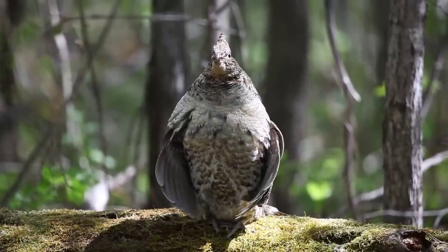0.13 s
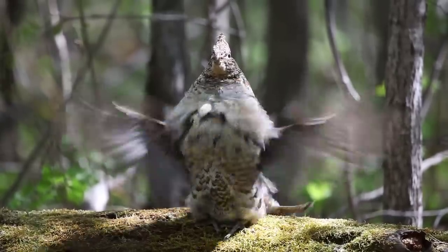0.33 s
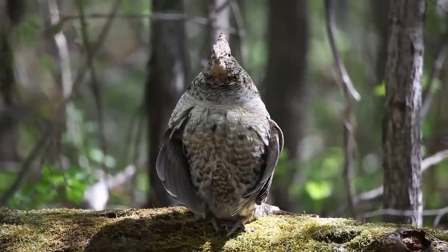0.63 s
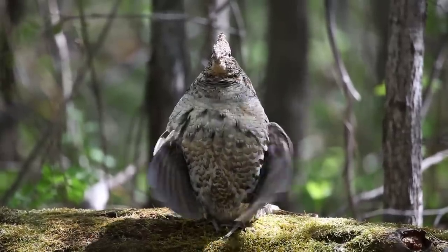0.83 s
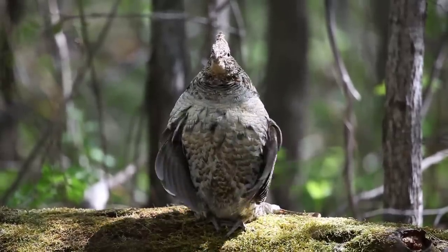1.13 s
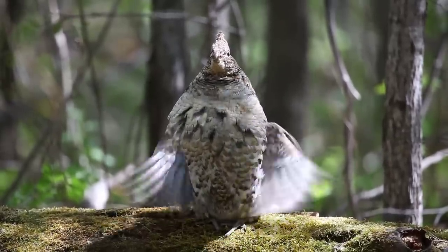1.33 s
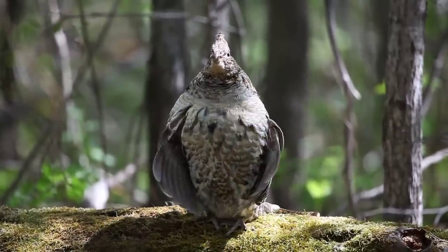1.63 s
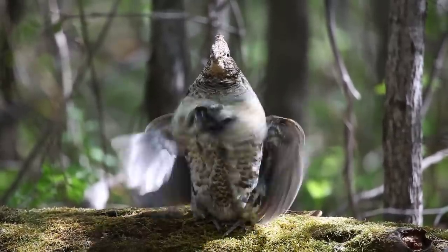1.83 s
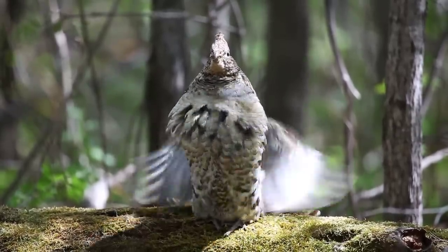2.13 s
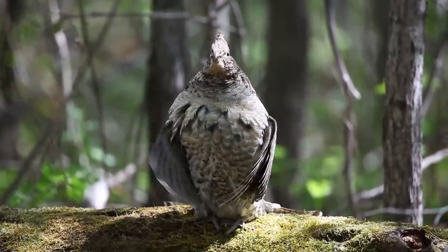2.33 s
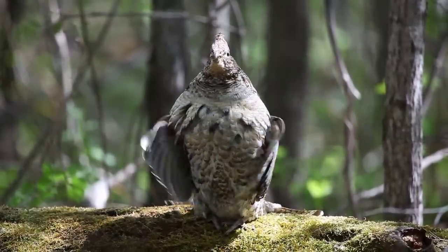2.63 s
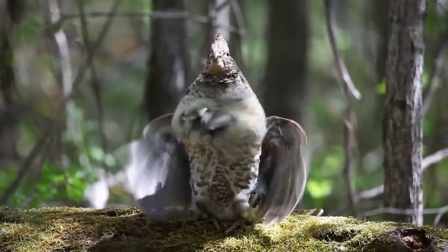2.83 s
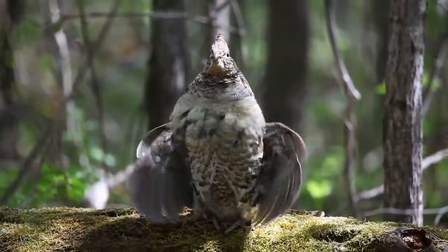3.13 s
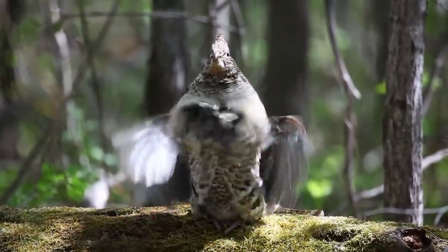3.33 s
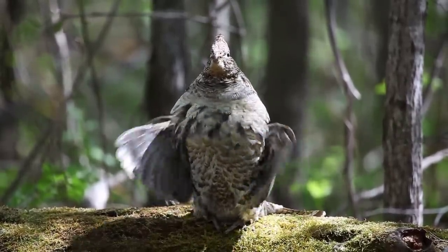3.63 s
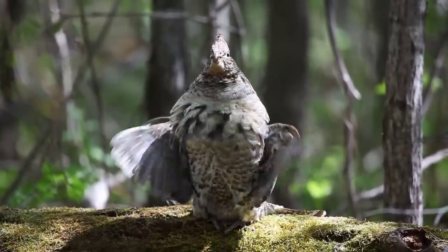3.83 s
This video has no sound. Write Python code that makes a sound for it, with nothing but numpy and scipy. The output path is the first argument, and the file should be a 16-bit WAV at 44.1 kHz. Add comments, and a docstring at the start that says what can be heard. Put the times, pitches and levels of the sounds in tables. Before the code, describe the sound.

Twelve accelerating low wing thumps, close and clear to the microphone, each with a brief feather swish and short bass echo; quiet outdoor woodland air, a faint insect buzz midway, and high bird chirps at the end.

```python
"""Grouse drumming on a log

A grouse drums with its wings, ever faster: each beat is a low, sagging pressure pulse with a puff and
a swish of feather noise. A resonant noise tail is the forest's soft answer in the bass.
Behind it: a far rush and leaf hiss of filtered noise, an insect's buzz of filtered clicks, faint dry
ticks of pulses into resonances, a bright twig snap, and a small bird's gliding sine whistles.
"""
import sys
import numpy as np
from scipy import signal
from scipy.fft import rfft, irfft, next_fast_len
from scipy.io import wavfile
from scipy.ndimage import uniform_filter1d, map_coordinates

SR = 44100
rng = np.random.default_rng(int(sys.argv[2]) if len(sys.argv) > 2 else 0)


def wrap_up_sound(samples):
    """Save the sound to the file named by the first command line argument, as 16-bit audio."""
    columns = np.atleast_2d(samples).T
    # keep every value between -1 and 1, then stretch to whole-number steps
    tamed = np.clip(columns, -1, 1)
    steps = np.round(tamed * 32767).astype(np.int16)
    wavfile.write(sys.argv[1], SR, steps)


def undo_db(level):
    """Turn decibels back into plain size, where 20 dB means ten times bigger."""
    steps = np.asarray(level, float) / 20
    return 10 ** steps


N = 176400

# air noise spectrum: frequency_hz, relative_db_per_hz
AIR_SPECTRUM = [(15, -64), (25, -24), (53, -12), (75, -13.5), (205, -13.5), (332, -6.5), (447, -12),
                (585, -3), (808, -13.5), (1590, -12), (2250, -15), (6440, -22.5), (15700, -36)]
# resonant bands of the far rush: centre_hz, width_hz (of one of two passes), level_db (before swell)
RUSH_BANDS = [(318, 18, -63), (346, 28, -67), (447, 110, -58), (599, 72, -60.5), (1307, 76, -66),
              (1601, 82, -70.5), (1791, 45, -68.5)]
# swell of the far rush, used relative to its mean: time_s, level_db
RUSH_SWELL = [(0.0, -49.5), (0.31, -48.5), (1.29, -52), (1.6, -50), (2.27, -48.5), (2.86, -50.5),
              (3.59, -46), (4.0, -52)]
# treble rustle of leaves, before LEAF_TRIM_DB: time_s, level_db
LEAF_LEVEL = [(0.0, -60.5), (1.48, -61.5), (1.78, -59.5), (2.07, -57), (2.43, -62), (2.78, -57),
              (2.94, -62), (3.39, -57.5), (4.0, -53.5)]
AIR_DB, LEAF_TRIM_DB = -53.5, -2.5

# insect loudness, before BUZZ_TRIM_DB: time_s, level_db
BUZZ_LEVEL = [(1.5, -71), (1.792, -61), (2.044, -52.5), (2.128, -53), (2.346, -63.5), (2.564, -61),
              (2.744, -54), (2.92, -66), (3.2, -62)]
# insect spectrum: frequency_hz, gain_db
BUZZ_SPECTRUM = [(3000, -8), (4500, -4), (5600, -8), (7000, 1), (8400, -11), (10000, -40), (14000, -50)]
BUZZ_HZ, BUZZ_JITTER_RATIO, BUZZ_TRIM_DB, BUZZ_FLICKER_DB = 214, 0.025, -4, 3.5

# small bird notes: start_s, length_s, from_hz, to_hz, level_db
BIRD_NOTES = [(3.690, .022, 6800, 5850, -61), (3.710, .026, 5800, 5720, -55), (3.739, .02, 6000, 5050, -52),
              (3.829, .05, 7050, 6750, -54), (3.854, .019, 6750, 5750, -50), (3.871, .02, 5750, 5480, -53),
              (3.889, .016, 6080, 5980, -54.5), (3.903, .022, 5950, 4000, -53),
              (3.913, .016, 5800, 6150, -57), (3.927, .014, 6100, 5300, -57), (3.984, .02, 7000, 6950, -50)]
BIRD_ECHO_DB, BIRD_ECHO_T60_S, BIRD_FLUTTER_DB, FALL_FADE_DB_PER_KHZ = -6, 0.06, 2, 3

# dry creaky ticks, maybe a far frog, before TICK_GAIN_DB: start_s, level_db
TICK_EVENTS = [(0.169, -35.5), (0.2347, -34.5), (0.3198, -36), (0.8982, -32.5), (1.0482, -32.5),
               (1.0608, -31.5), (1.1232, -35), (1.3371, -36.5), (1.4765, -36), (1.5509, -34.5),
               (2.1802, -35), (2.2152, -36), (2.2717, -31), (2.354, -30.5), (2.3785, -36), (2.6435, -36),
               (2.8315, -35.5), (2.9342, -36), (3.0072, -36), (3.2737, -34.5), (3.2954, -37), (3.4232, -34),
               (3.4536, -31), (3.521, -34), (3.6663, -31.5), (3.7212, -36), (3.8518, -36.5), (3.8746, -37)]
# tick resonances: centre_hz, width_hz, gain_db
TICK_RESONANCES = [(1862, 115, 4.5), (3260, 5700, 0)]
TICK_GAIN_DB, TICK_PULSE_HZ, TICK_JITTER_PERIODS, TICK_TOP_HZ = 12, 632, 0.031, 4570
# bright twig snap: start_s, level_db
TWIG_SNAPS = [(3.3239, -32)]
SNAP_HZ, SNAP_DECAY_S = 7450, 0.0003

# wing beats: deepest_suction_s, thump_peak_db, swish_burst_db, puff_peak_db
WING_BEATS = [(0.4057, -18.5, -43.5, -43), (0.967, -17, -42, -38.5), (1.4488, -16, -41.5, -33),
              (1.868, -15.5, -41.5, -39), (2.2379, -15.5, -39.5, -37), (2.568, -16, -40, -35),
              (2.866, -16, -39.5, -39), (3.1322, -16.5, -41.5, -64), (3.374, -17, -40, -48),
              (3.5964, -16.5, -41, -40), (3.798, -16.5, -39.5, -49), (3.9829, -17, -40, -41)]
# feather noise spectrum: frequency_hz, relative_db_per_hz
FEATHER_SPECTRUM = [(590, 1), (1000, -3), (2360, -10.5), (2620, -9), (3010, -9.5), (6790, -2.5), (8440, -9),
                    (9580, -19.5), (15500, -38)]
THUMP_HZ, THUMP_SAG_HZ_PER_S, THUMP_RISE_S, THUMP_FALL_S = 85.2, 4800, 0.0042, 0.0054
TIRE_HZ_PER_S, SAG_FADE_S = 1.46, 3.5  # later beats: lower, steadier pitch
PUFF_HZ, PUFF_SPREAD_HZ, PUFF_LEAD_S, PUFF_S = 768, 47.6, 0.0017, 0.0022
SWISH_LEAD_S, SWISH_RISE_S, SWISH_FALL_S, SWISH_GRAIN_DB = 0.0045, 0.0038, 0.0035, 2.5
SETTLE_DB, SETTLE_S, RETURN_DB, RETURN_S = -3, 0.043, -11, 0.017  # dB relative to the burst
FLUFF_DB, FLUFF_HZ, FLUFF_WIDTH_HZ, FLUFF_S = -13.5, 197, 120, 0.009  # low turbulence under the swish
RUMBLE_DB, RUMBLE_AT_S, RUMBLE_S = -49, 3.64, 0.035  # one longer low gust
ECHO_DB, ECHO_T60_S, ECHO_DELAY_S, ECHO_HZ, ECHO_WIDTH_HZ = -19.5, 0.47, 0.0161, 101, 41

TOP_HZ, LOW_CUT_HZ = 15800, 36


def unit(x):
    """Scale to rms 1."""
    return x / np.sqrt(np.mean(x ** 2) + 1e-20)


def along(points, hz):
    """Interpolate (Hz, value) points on a log-frequency axis."""
    f, v = np.transpose(points)
    return np.interp(np.log(hz + 1), np.log(f + 1), v)


def curve(rows):
    """Interpolate (s, value) rows to one value per sample."""
    s, v = np.transpose(rows)
    return np.interp(np.arange(N) / SR, s, v)


def wobble(rate_hz):
    """Smooth random curve with rate_hz knots a second."""
    knots = rng.standard_normal(int(N * rate_hz / SR) + 4)
    return map_coordinates(knots, [np.arange(N) * rate_hz / SR])


def filtered(x, response):
    """Apply a frequency response, a function of Hz."""
    m = next_fast_len(N + 8192)
    return irfft(rfft(x, m) * response(np.fft.rfftfreq(m, 1 / SR)), m)[..., :N]


def shaped_noise(response):
    """White noise through a response, at rms 1."""
    return unit(filtered(rng.standard_normal(N), response))


def peak(centre_hz, width_hz):
    """Response of a causal second-order resonance."""
    return lambda f: 1j * f * width_hz / (centre_hz ** 2 - f * f + 1j * f * width_hz)


def patchy(patchy_db):
    """White noise with random gain patches in time and frequency."""
    z = signal.stft(rng.standard_normal(N), nperseg=512)[2]
    field = uniform_filter1d(rng.standard_normal(z.shape), size=6, axis=0)
    field = uniform_filter1d(field, size=8, axis=1)
    return signal.istft(z * undo_db(patchy_db * unit(field)), nperseg=512)[1][:N]


def hump(t, rise_s, fall_s):
    """Gaussian bell with its own width on each side."""
    return np.exp(-.5 * (t / np.where(t < 0, rise_s, fall_s)) ** 2)


def forest():
    """Air noise with steady treble; its bass and the rush's resonant bands swell; leaves hiss above."""
    air = undo_db(AIR_DB) * unit(filtered(patchy(patchy_db=0.97), lambda f: undo_db(along(AIR_SPECTRUM, f))))
    low = filtered(air, lambda f: 1 / (1 + (f / 2500) ** 2))
    bands = np.zeros(N)
    for hz, width_hz, db in RUSH_BANDS:
        level = undo_db(db + 1.2 * wobble(4.7))
        bands += level * shaped_noise(lambda f: peak(hz, width_hz)(f) ** 2)
    swell_db = curve(RUSH_SWELL)
    swell = undo_db(swell_db - swell_db.mean() + 0.49 * wobble(9))
    leaves = undo_db(curve(LEAF_LEVEL) + LEAF_TRIM_DB) * shaped_noise(lambda f: peak(6700, 3500)(f) ** 2)
    return leaves + (air - low) + swell * (low + bands)


def insect():
    """Fast wing clicks with an unsteady rate; treble and lower band flicker independently."""
    turns = np.cumsum(BUZZ_HZ * (1 + BUZZ_JITTER_RATIO * wobble(20))) / SR
    clicks = np.diff(np.floor(turns), prepend=0) * undo_db(1.3 * rng.standard_normal(N))
    tone = unit(filtered(clicks, lambda f: undo_db(along(BUZZ_SPECTRUM, f))))
    high = filtered(tone, lambda f: 1 / (1 + (5600 / (f + 1)) ** 12))
    level_db = curve([(0, -90)] + list(BUZZ_LEVEL) + [(BUZZ_LEVEL[-1][0] + .2, -90)])
    high_flicker = undo_db(BUZZ_FLICKER_DB * wobble(24.51))
    low_flicker = undo_db(BUZZ_FLICKER_DB * wobble(25.4))
    return undo_db(level_db + BUZZ_TRIM_DB) * (high * high_flicker + (tone - high) * low_flicker)


def bird():
    """Sine whistles with linear glides, fading as they fall; a short noise tail is the smear of leaves."""
    out = np.zeros(N + SR)
    for s, length_s, from_hz, to_hz, db in BIRD_NOTES:
        u = np.linspace(0, 1, round(length_s * SR))
        bow = np.sqrt(2 * np.sin(np.pi * u).clip(0))
        fade = undo_db(-FALL_FADE_DB_PER_KHZ * (from_hz - to_hz) / 1000 * u)
        cycles = length_s * (from_hz * u + (to_hz - from_hz) * u * u / 2)
        out[round(s * SR):][:len(u)] += undo_db(db) * bow * fade * np.sin(2 * np.pi * cycles)
    out[:N] *= undo_db(BIRD_FLUTTER_DB * wobble(130))
    t = np.arange(SR // 5) / SR
    tail = rng.standard_normal(len(t)) * undo_db(-60 * t / BIRD_ECHO_T60_S)
    echo = signal.fftconvolve(out, tail / np.linalg.norm(tail))[:N]
    return out[:N] + undo_db(BIRD_ECHO_DB) * echo


def ticks():
    """Four quick pulses per tick excite two resonances, the later ones weaker on average."""
    pulses, k = np.zeros(N), np.arange(4)
    for s, db in TICK_EVENTS:
        at_s = s + (k + TICK_JITTER_PERIODS * rng.standard_normal(4)) / TICK_PULSE_HZ
        pulse_db = db + TICK_GAIN_DB + rng.normal(0, 3, 4) - 1.5 * k
        pulses[np.round(at_s * SR).astype(int)] += undo_db(pulse_db)

    def body(f):
        """Parallel resonances under a steep treble limit."""
        modes = sum(undo_db(db) * peak(hz, width_hz)(f) for hz, width_hz, db in TICK_RESONANCES)
        return modes / (1 + (f / TICK_TOP_HZ) ** 8)

    return filtered(pulses, body)


def twig_snap():
    """A very short decaying sine."""
    out, t = np.zeros(N + SR), np.arange(SR // 10) / SR
    for s, db in TWIG_SNAPS:
        out[round(s * SR):][:len(t)] += undo_db(db) * np.exp(-t / SNAP_DECAY_S) * np.sin(2 * np.pi * SNAP_HZ * t)
    return out[:N]


def trunk_echo(thump):
    """Trunks return the bass: a delayed, decaying noise tail through a low resonance."""
    t = np.arange(SR // 2) / SR
    tail = rng.standard_normal(len(t)) * undo_db(-60 * t / ECHO_T60_S) * (t > ECHO_DELAY_S)
    echo = signal.fftconvolve(thump, tail / np.linalg.norm(tail))[:N]
    return undo_db(ECHO_DB) * filtered(echo, peak(ECHO_HZ, ECHO_WIDTH_HZ))


def wings():
    """Each beat pushes, pulls and pushes air, with a puff and a swish that returns once and settles."""
    thump, puff, swish, fluff = np.zeros((4, N))
    for s, thump_db, swish_db, puff_db in WING_BEATS:
        i = slice(round((s - .06) * SR), round((s + .15) * SR))
        t = np.arange(N)[i] / SR - s
        sag_hz_per_s = THUMP_SAG_HZ_PER_S * np.exp(-s / SAG_FADE_S)
        cycles = (THUMP_HZ - TIRE_HZ_PER_S * s) * t - sag_hz_per_s * t * t / 2
        thump[i] -= undo_db(thump_db) * hump(t, THUMP_RISE_S, THUMP_FALL_S) * np.cos(2 * np.pi * cycles)

        puff_hz = PUFF_HZ + rng.normal(0, PUFF_SPREAD_HZ)
        puff_wave = np.cos(2 * np.pi * puff_hz * t + rng.uniform(0, 2 * np.pi))
        puff[i] -= undo_db(puff_db) * hump(t + PUFF_LEAD_S, PUFF_S, PUFF_S) * puff_wave

        u = t + SWISH_LEAD_S
        burst = hump(u, SWISH_RISE_S, SWISH_FALL_S)
        settle = np.where(u < 0, hump(u, 2 * SWISH_RISE_S, 1), np.exp(-np.abs(u) / SETTLE_S))
        second = hump(u - RETURN_S, SWISH_RISE_S, SWISH_FALL_S)
        swish[i] += undo_db(swish_db) * (burst + undo_db(SETTLE_DB) * settle + undo_db(RETURN_DB) * second)
        fluff[i] += undo_db(swish_db + FLUFF_DB) * hump(t, FLUFF_S, 2 * FLUFF_S)

    fluff += undo_db(RUMBLE_DB) * hump(np.arange(N) / SR - RUMBLE_AT_S, RUMBLE_S, 2 * RUMBLE_S)
    feathers = filtered(rng.standard_normal(N), lambda f: undo_db(along(FEATHER_SPECTRUM, f)))
    rustle = unit(feathers * undo_db(SWISH_GRAIN_DB * wobble(350)))
    gust = shaped_noise(lambda f: peak(FLUFF_HZ, FLUFF_WIDTH_HZ)(f) ** 2)
    return thump + puff + fluff * gust + swish * rustle + trunk_echo(thump)


def scene():
    """Sum all sources at one microphone."""
    return (forest() + insect() + bird() + ticks() + twig_snap() + wings())[None]


def band_limit(x):
    """A steep low-pass at the top of the band."""
    return signal.sosfilt(signal.butter(12, 15810, fs=SR, output="sos"), x)


def record(dry):
    """Low cut and sharp treble limit."""
    mix = filtered(dry, lambda f: (f < TOP_HZ) / (1 + (LOW_CUT_HZ / (f + 1)) ** 3))
    return band_limit(mix)


dry = scene()
out = record(dry)
wrap_up_sound(out)
```